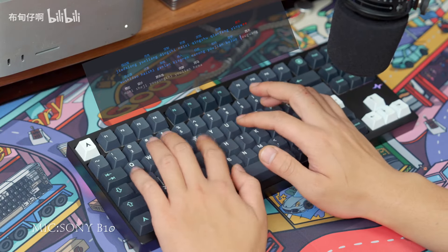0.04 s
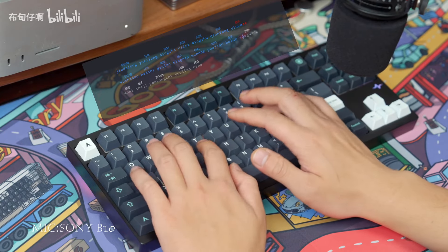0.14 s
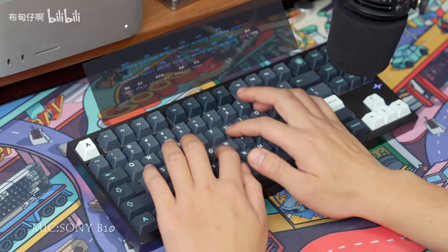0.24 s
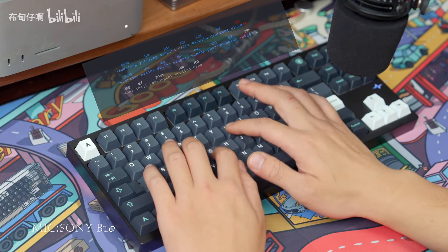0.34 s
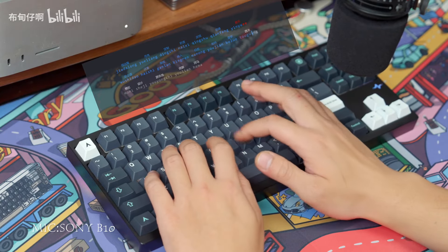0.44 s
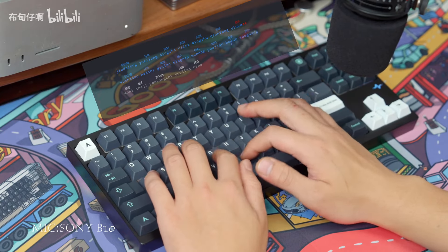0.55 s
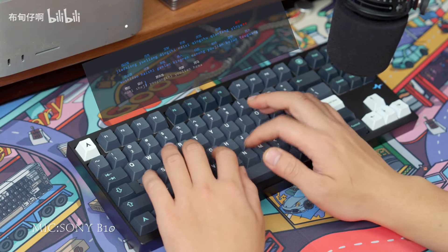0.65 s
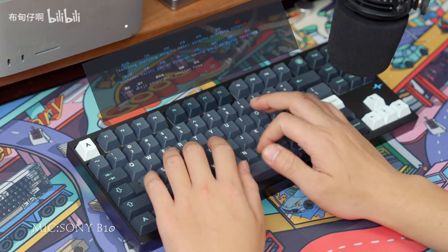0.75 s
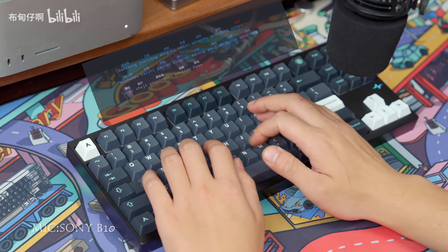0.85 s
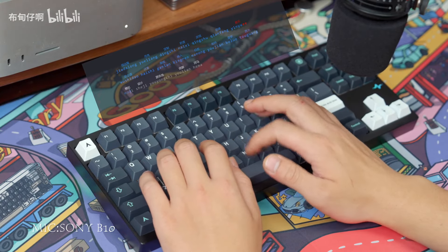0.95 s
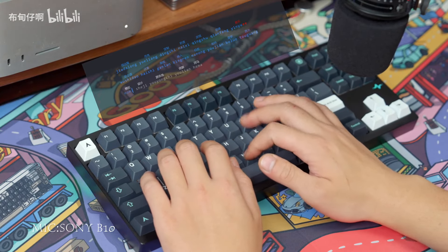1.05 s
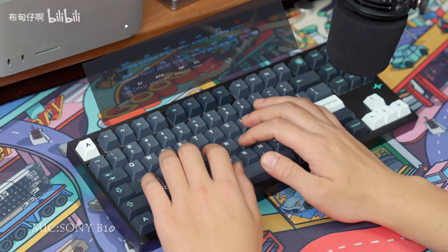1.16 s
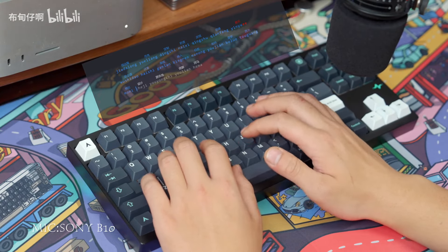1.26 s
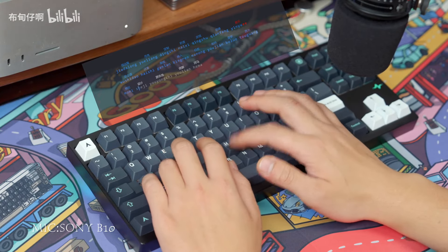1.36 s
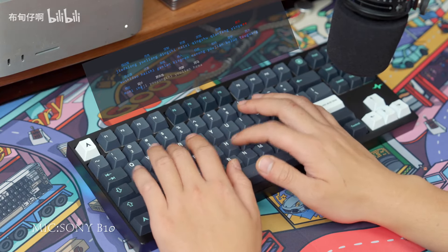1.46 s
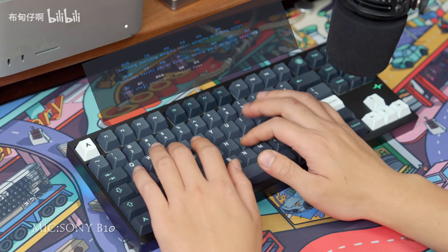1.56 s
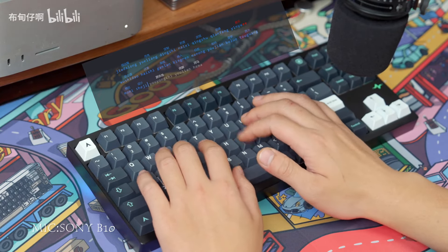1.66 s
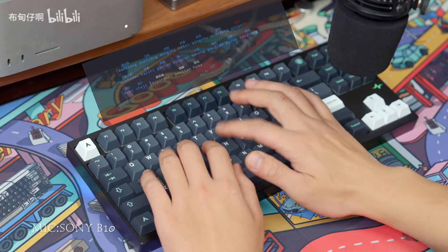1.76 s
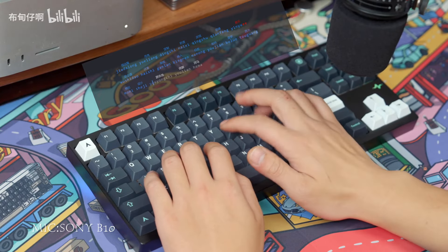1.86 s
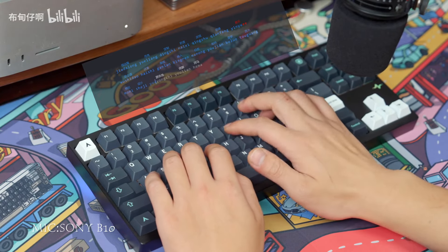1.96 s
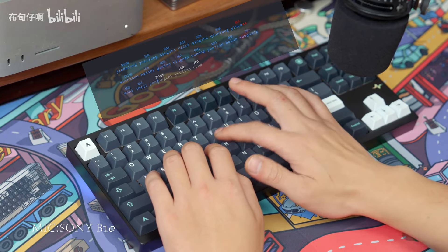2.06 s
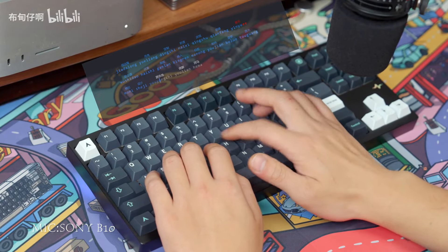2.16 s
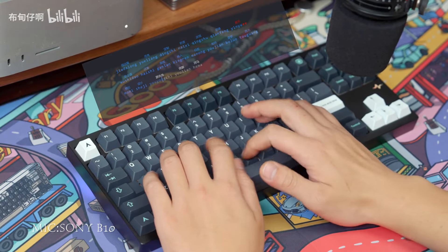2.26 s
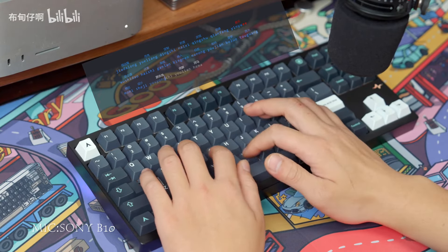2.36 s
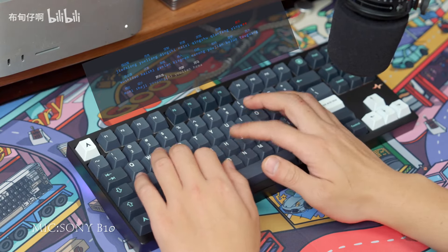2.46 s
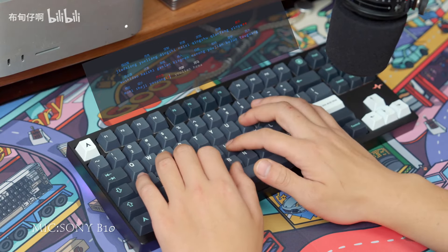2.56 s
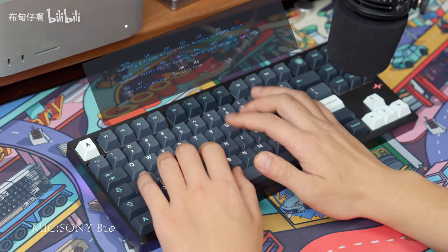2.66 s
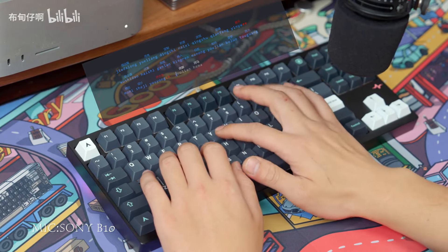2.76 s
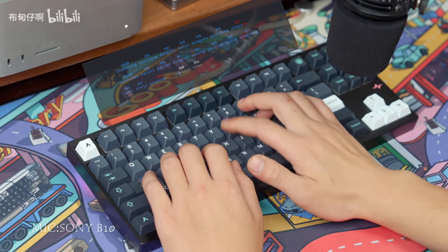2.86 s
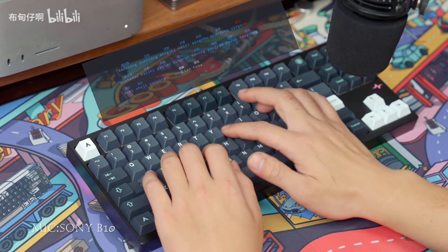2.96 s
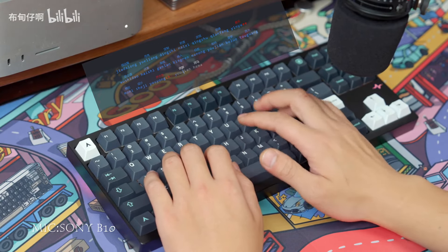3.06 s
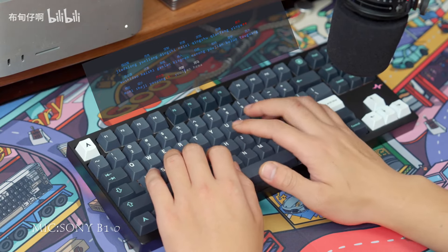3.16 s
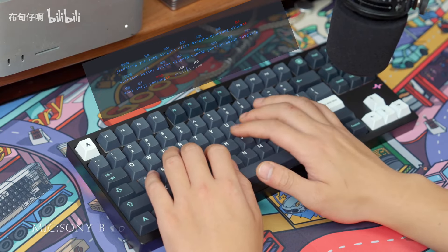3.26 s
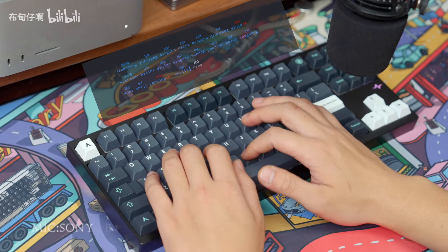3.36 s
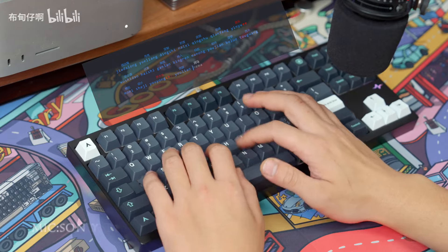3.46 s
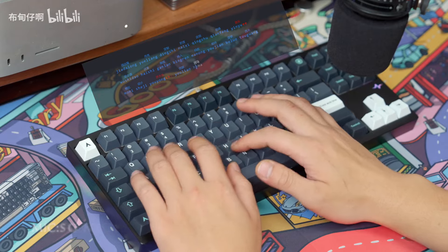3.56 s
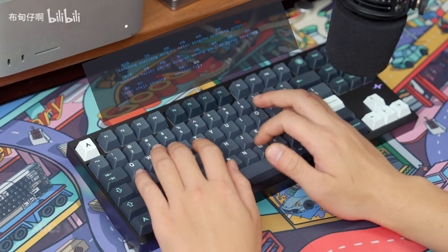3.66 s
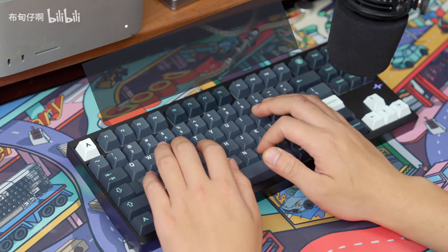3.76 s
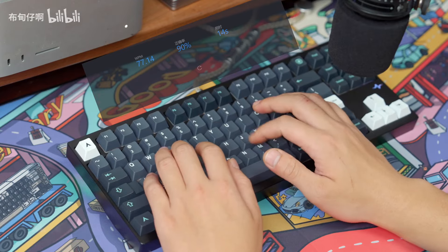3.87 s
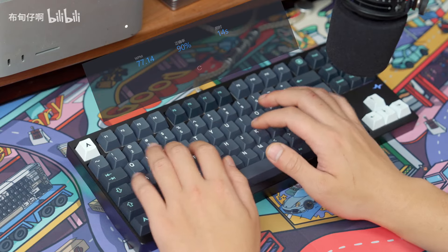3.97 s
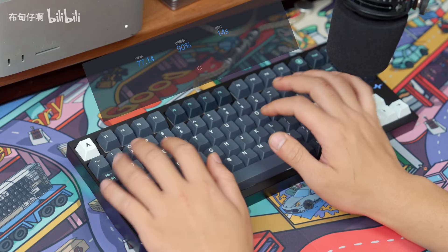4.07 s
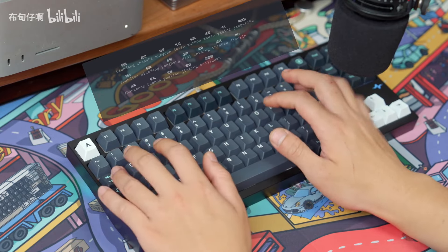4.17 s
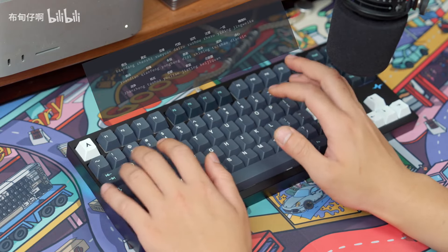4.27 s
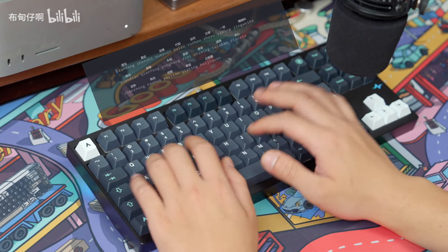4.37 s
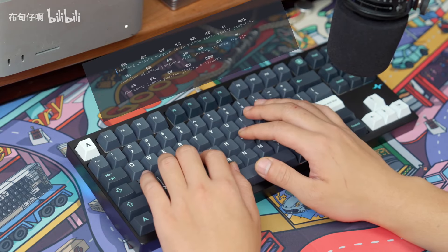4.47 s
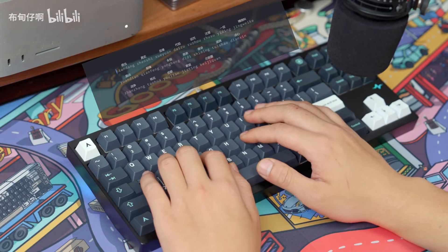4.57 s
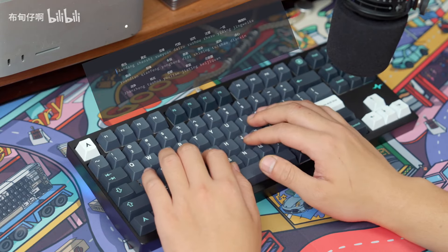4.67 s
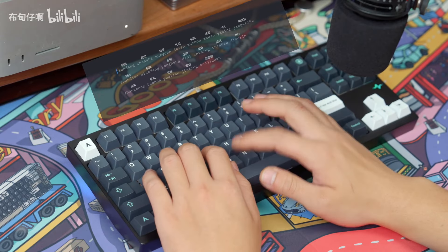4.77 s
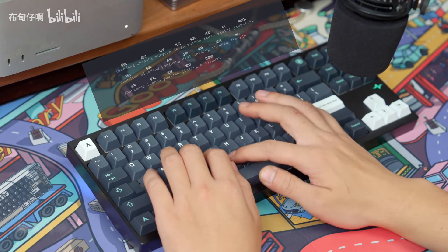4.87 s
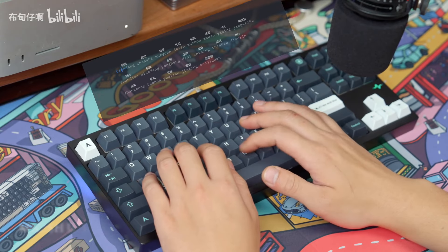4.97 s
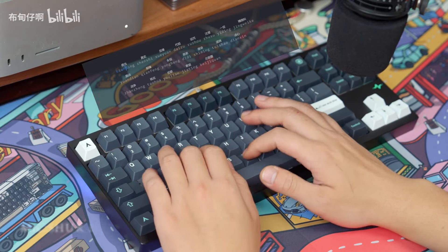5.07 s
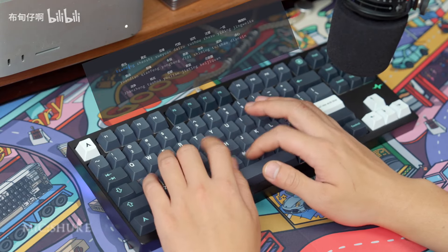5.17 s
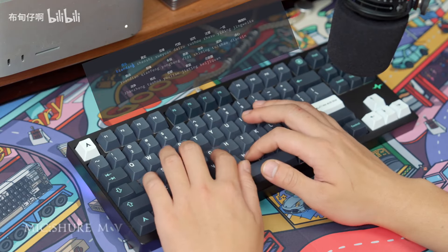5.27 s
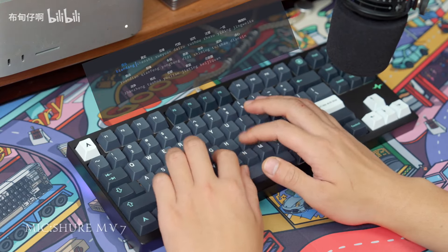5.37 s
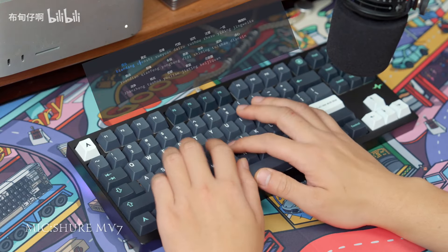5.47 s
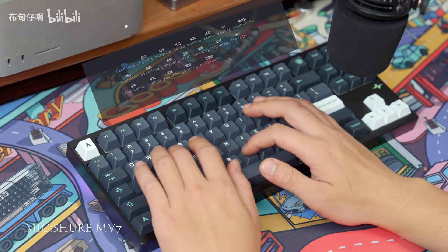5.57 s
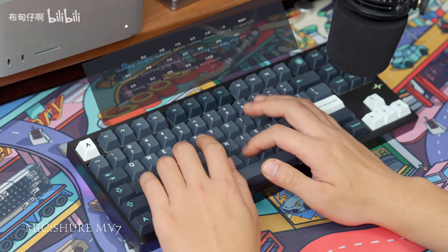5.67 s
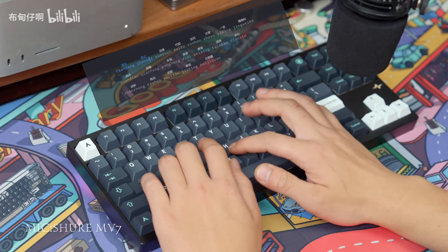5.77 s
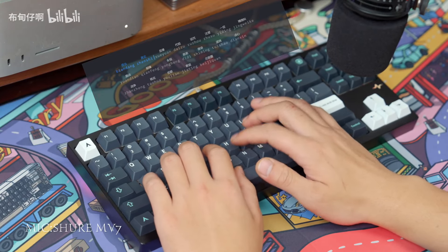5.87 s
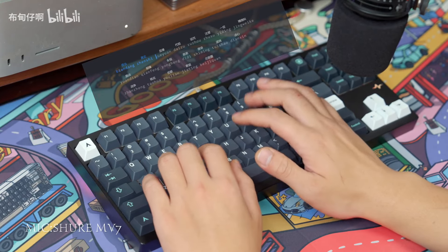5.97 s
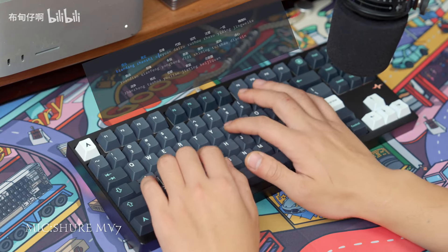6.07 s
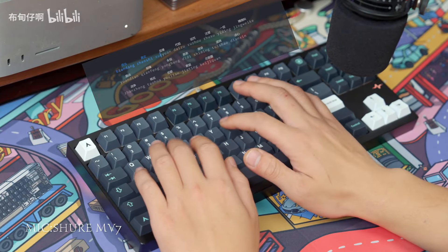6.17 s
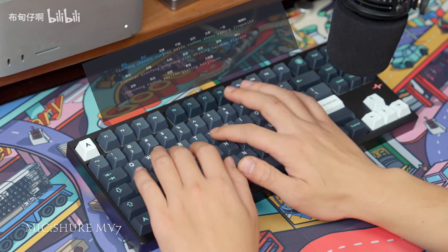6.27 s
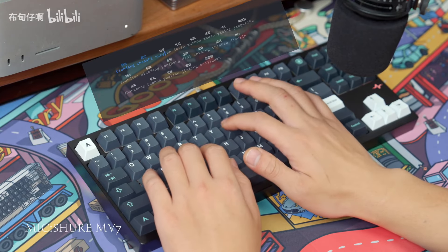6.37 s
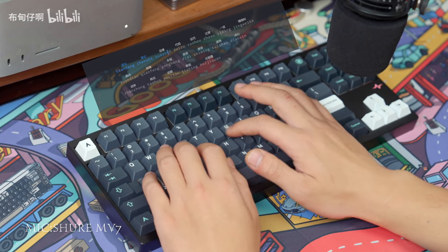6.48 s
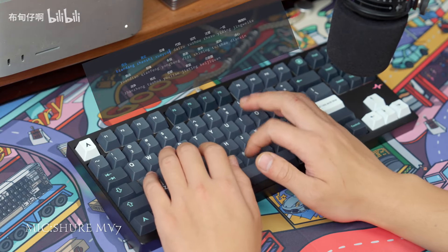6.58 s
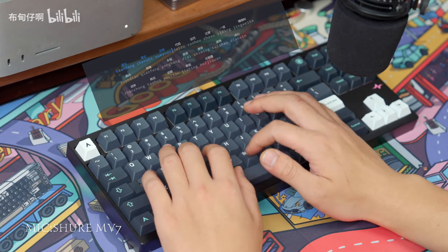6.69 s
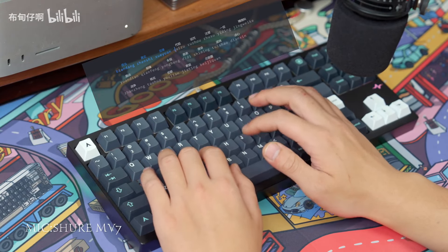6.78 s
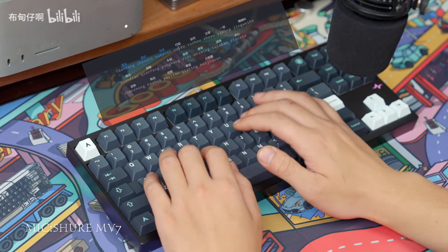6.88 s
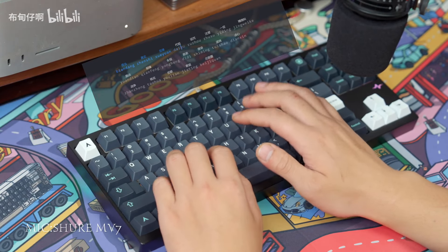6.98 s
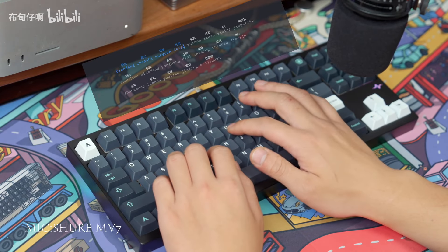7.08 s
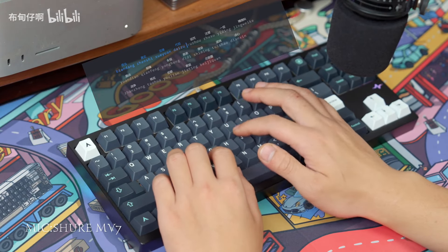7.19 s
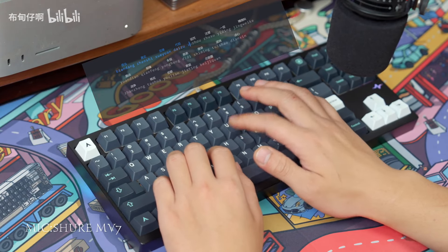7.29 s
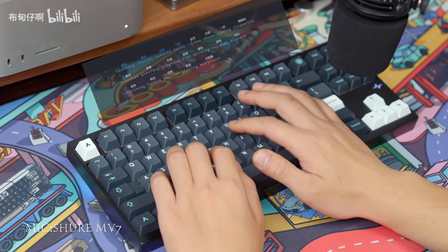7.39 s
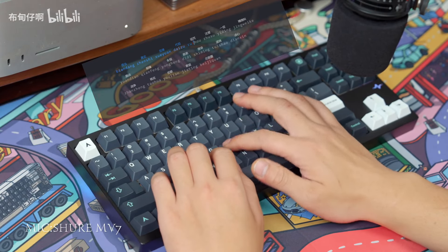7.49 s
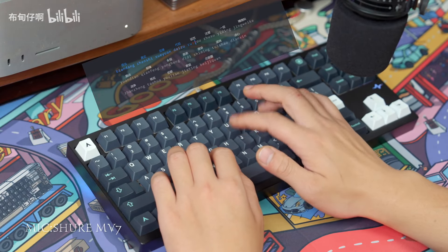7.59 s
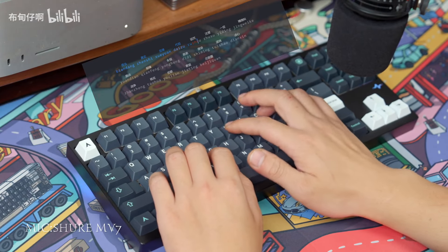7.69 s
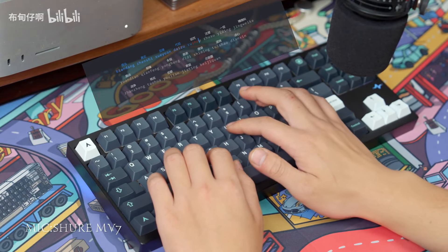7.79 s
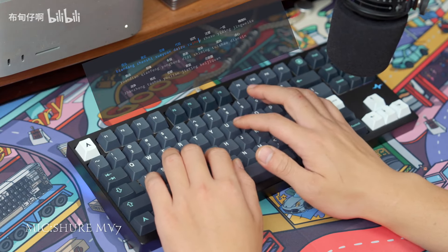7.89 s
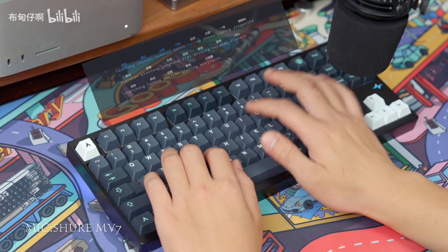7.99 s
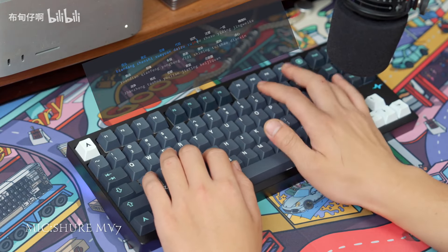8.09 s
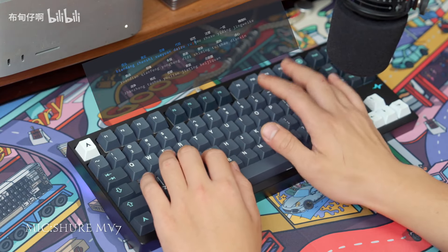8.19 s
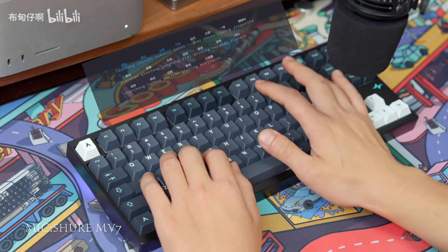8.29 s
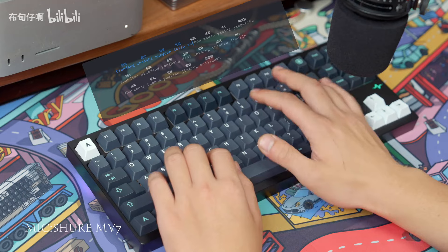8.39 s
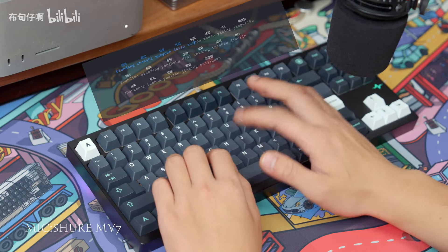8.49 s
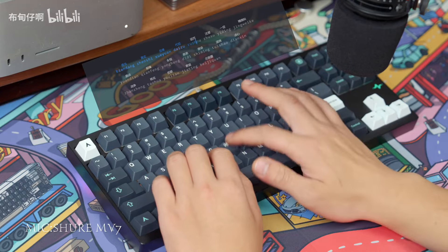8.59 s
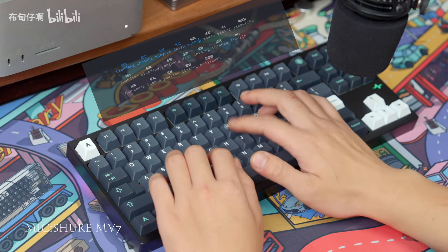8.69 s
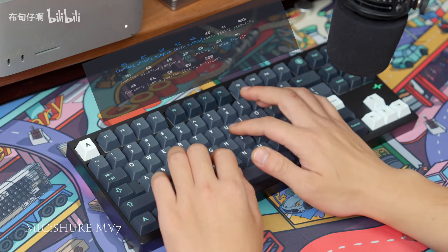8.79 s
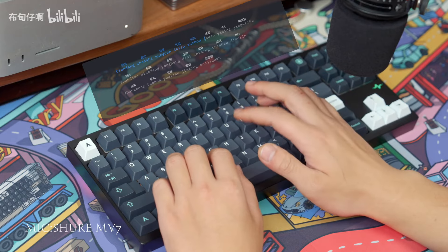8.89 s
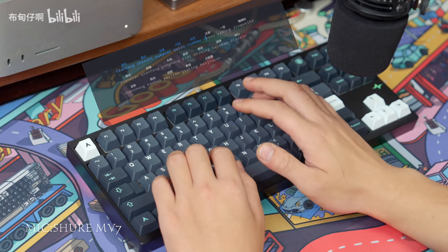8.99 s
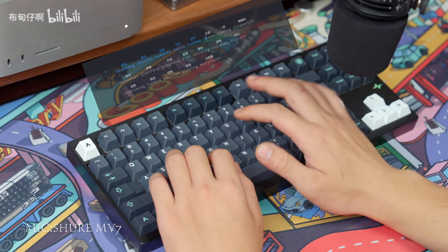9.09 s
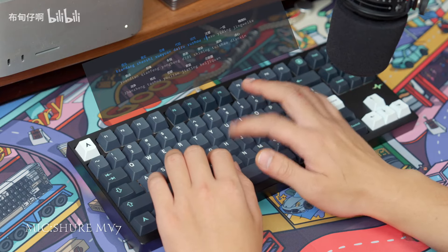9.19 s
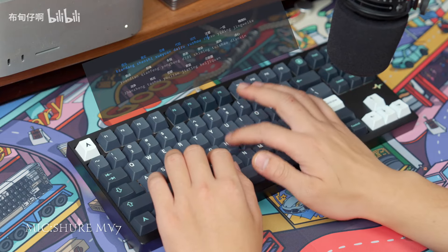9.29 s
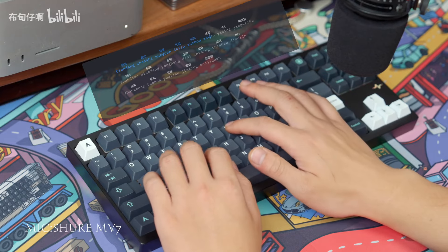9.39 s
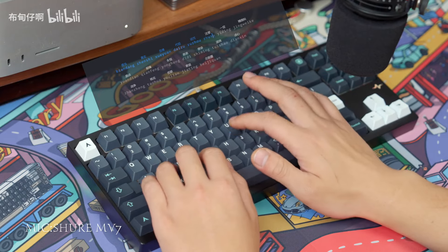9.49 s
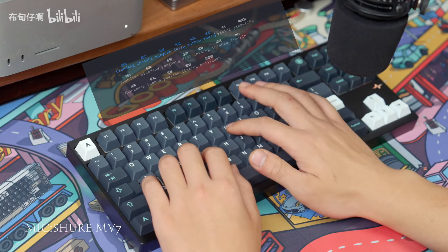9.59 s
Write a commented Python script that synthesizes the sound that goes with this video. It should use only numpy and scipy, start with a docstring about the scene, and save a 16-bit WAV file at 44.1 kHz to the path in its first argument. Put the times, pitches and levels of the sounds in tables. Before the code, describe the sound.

Irregular, rapid keyboard clacks, eight to fifteen a second, mix letter keys, softer upstrokes and hollower space-bar hits. The first half sounds slightly distant, bright and roomy over hiss, faint fan hum and low rumble. At about four and a half seconds the background drops and typing returns close, dry and fuller, with a short run of rattly long-key hits near eight seconds.

```python
"""Fast typing on a well-damped mechanical keyboard on a desk mat, in a small quiet room.
Each key clacks on the way down and up: short damped sines for its cap, switch and plate, about a millisecond.
Echoes, case ring, rattle and room follow each blow; filtered noise makes the hiss, fan and low rumble.
The first half is heard through an airy, hissy microphone, the second through a close, darker one."""
import sys
import numpy as np
from scipy import signal
from scipy.fft import rfft, irfft, next_fast_len
from scipy.io import wavfile

SR = 44100
rng = np.random.default_rng(int(sys.argv[2]) if len(sys.argv) > 2 else 0)


def pcm_store(signal):
    """Save signal as 16-bit PCM."""
    levels = np.round(np.clip(np.atleast_2d(signal), -1, 1) * 32767)
    wavfile.write(sys.argv[1], SR, levels.astype(np.int16).T)


N = 425124
SWITCH_S = 4.46  # middle of the cross-fade between the microphones


def amp(db):
    """Decibels to gain."""
    return 10 ** (np.asarray(db) / 20)


def unit(x):
    """Scale to rms 1."""
    return x / np.sqrt(np.mean(x ** 2) + 1e-20)


def along(points, hz):
    """Read a curve of (f, value) points on a log frequency axis."""
    f, value = np.transpose(points)
    return np.interp(np.log(hz + 1), np.log(f + 1), value)


def filtered(x, response):
    """Shape x by a gain that depends on frequency, padded so that the ends do not wrap."""
    size = next_fast_len(len(x) + SR // 2)
    spectrum = rfft(x, size) * response(np.fft.rfftfreq(size, 1 / SR))
    return irfft(spectrum, size)[:len(x)]


def add(track, s, sound):
    """Mix a sound into the track at s seconds, trimmed to fit."""
    start = round(s * SR)
    part = sound[max(-start, 0):max(len(track) - start, 0)]
    track[max(start, 0):][:len(part)] += part


def ring(t, hz, db, rise):
    """A heavily damped mode: it swells for rise seconds and dies as quickly."""
    envelope = t / rise * np.exp(1 - t / rise)
    return amp(db) * envelope * np.sin(2 * np.pi * hz * t)


SNAP_HZ = 7650  # mean pitch of the sharp snap of the contact
# relative scatter of pitch: no two switches ring quite alike
HOUSING_SPREAD, SNAP_SPREAD, STEM_SPREAD = 0.091, 0.11, 0.017
STEM_LAG_S = 0.000286  # the stem lands up to this long after the cap
HOUSING_SHARE = 0.61  # dB that the housing gains per dB of brightness; snap and stem follow it fully


def clack(ring_mix, long_key, cap_db, cap_hz, bright_db):
    """A hard plastic contact rings plate, cap and switch; a sharper one favours the high parts."""
    plate_db, housing_hz, housing_db, snap_db, stem_hz, stem_db = ring_mix
    spreads = np.array([HOUSING_SPREAD, SNAP_SPREAD, STEM_SPREAD])
    housing_tune, snap_tune, stem_tune = 1 + spreads * rng.standard_normal(size=3)
    housing_level = cap_db + housing_db + HOUSING_SHARE * bright_db
    treble_db = cap_db + bright_db
    t = np.arange(SR // 140) / SR
    stem_t = np.maximum(t - STEM_LAG_S * rng.random(), 0)
    plate = ring(t, 1446, cap_db + plate_db, rise=0.00061)
    cap = ring(t, cap_hz, cap_db, rise=0.0003)
    housing = ring(t, housing_hz * housing_tune, housing_level, rise=0.00026)
    snap = ring(t, SNAP_HZ * snap_tune, treble_db + snap_db, rise=0.00019)
    stem = ring(stem_t, stem_hz * stem_tune, treble_db + stem_db, rise=0.00016)
    # a long key adds the hollow under its cap and the tick of its stabiliser wire
    hollow = ring(t, 590, cap_db - 15.5, rise=0.00017) + ring(t, 930, cap_db - 13.5, rise=0.0005)
    wire = ring(t, 13500, treble_db - 11, rise=0.00026)
    return plate + cap + housing + snap + stem + long_key * (hollow + wire)


# Contacts as loud as each microphone hears them; levels and pitches are those of the cap.
# letter keys hitting bottom, and one faint finger touch at 8.13 s: (t/s, level/dB, cap f/Hz, brightness/dB)
LETTER_PRESSES = [(.192, -18.5, 2870, -1.5), (.2779, -18, 3350, -3.5), (.3248, -13, 2970, -2),
                  (.3973, -19.5, 2800, 3.5), (.4708, -14, 3000, -1), (.5498, -23, 2700, 11),
                  (.6432, -15.5, 2830, 2), (.6587, -17.5, 2750, 1), (.8755, -14, 2930, 1.5),
                  (.9224, -17, 3120, -3), (1.1073, -18.5, 2860, 2), (1.191, -16, 3070, -2.5),
                  (1.2522, -19, 2860, -14), (1.327, -19.5, 2640, -3), (1.4356, -16.5, 2520, 7),
                  (1.5125, -11.5, 2690, 6.5), (1.6043, -13.5, 2970, -2), (1.6864, -16.5, 2950, 1),
                  (1.7352, -16.5, 3100, -2.5), (1.8072, -23.5, 2820, -8), (1.915, -14.5, 2810, 5),
                  (2.0906, -15.5, 2940, -4), (2.2131, -18, 2930, -1), (2.3166, -12.5, 3150, -1.5),
                  (2.3957, -13.5, 2740, 2.5), (2.4535, -18.5, 2650, 3), (2.5191, -20, 2710, -7),
                  (2.596, -22.5, 2670, 4.5), (2.6431, -15.5, 2830, 5.5), (2.694, -15, 2830, 1),
                  (2.7414, -17.5, 2680, -5.5), (2.8846, -32, 3030, -2), (2.9565, -14.5, 3040, -2),
                  (3.0286, -20.5, 2930, -5), (3.195, -17.5, 2770, -0.5), (3.3381, -11.5, 2920, 0.5),
                  (3.4123, -25, 2760, 6.5), (3.4658, -15, 2720, 3.5), (3.5755, -21, 2570, -9),
                  (3.652, -16.5, 2780, 4), (3.7077, -18.5, 3040, -3.5), (3.8372, -12.5, 2940, 2.5),
                  (3.9204, -22.5, 2670, 10.5), (4.9434, -10, 2960, -3), (5.0468, -11, 2700, -1),
                  (5.0727, -20, 2400, 7), (5.1523, -10.5, 2830, -2.5), (5.191, -15.5, 2860, -2.5),
                  (5.2645, -19.5, 2520, 11.5), (5.3244, -12, 2990, -4), (5.3769, -14.5, 2730, 3),
                  (5.4559, -16, 2960, -14), (5.5296, -15.5, 3170, -4), (5.5854, -7.5, 2630, 2.5),
                  (5.6684, -11, 2790, 1.5), (5.7431, -14, 2920, -5), (5.7948, -11.5, 2750, 1.5),
                  (5.8833, -13.5, 2720, 1.5), (5.9636, -10, 2720, 1.5), (6.133, -14, 3000, -6),
                  (6.1753, -37, 2900, 5), (6.1822, -5.5, 2700, 0), (6.3343, -14.5, 2820, -2),
                  (6.4007, -9, 2650, -1.5), (6.5367, -9.5, 2690, -3.5), (6.6156, -21, 2590, 4.5),
                  (6.7426, -12.5, 2850, -1), (6.8841, -13, 2830, -1.5), (6.9788, -21.5, 2770, 5.5),
                  (7.0192, -16, 2750, -21), (7.0267, -10.5, 2680, -1), (7.134, -14.5, 3170, -3),
                  (7.2003, -7, 2670, -1), (7.3745, -14.5, 3160, -6), (7.4492, -10, 2730, -4),
                  (7.6014, -12, 2830, -5), (7.7467, -12, 2670, 0), (7.821, -7, 2660, -2.5),
                  (8.1258, -46.5, 3000, 5), (8.5895, -12, 3180, -8), (8.6669, -4, 2790, 3.5),
                  (8.789, -12, 2650, -2), (8.8359, -7.5, 2660, -2), (8.987, -9.5, 3200, -5),
                  (9.3566, -6.5, 2750, 3.5), (9.4858, -8, 2740, -2.5)]
# letter keys springing back up: (t/s, level/dB, cap f/Hz)
LETTER_RELEASES = [(.3099, -28, 2340), (.3646, -24.5, 2350), (0.4136, -30, 2560), (0.492, -25.5, 2590),
                   (.7756, -23, 2480), (.9712, -23.5, 2560), (1.5372, -22.5, 2420), (1.594, -21.5, 2580),
                   (1.8274, -29, 2250), (1.9865, -24, 2380), (2.1406, -26.5, 2340), (2.3041, -30, 2440),
                   (2.502, -24, 2550), (2.781, -28.5, 2190), (2.94, -29, 2280), (3.072, -29.5, 2260),
                   (3.1313, -24.5, 2800), (3.2839, -24.5, 2500), (3.742, -26.5, 2550),
                   (3.7907, -30.5, 2830), (3.9686, -26.5, 2620), (4.59, -42, 2650), (5.0546, -22, 2560),
                   (5.1798, -26, 2440), (5.2472, -16.5, 2860), (5.3219, -22, 2800), (5.417, -30.5, 2440),
                   (5.4841, -26, 2370), (5.6126, -25.5, 2870), (5.75, -27, 2620), (5.8133, -17.5, 2620),
                   (5.9345, -36, 2580), (5.9962, -17.5, 2550), (6.0464, -20.5, 2290), (6.2263, -19.5, 2730),
                   (6.269, -20, 2360), (6.4294, -33, 2630), (6.4707, -18.5, 2390), (6.6401, -24, 2360),
                   (6.834, -22.5, 2550), (7.0854, -18, 2350), (7.257, -30.5, 2880), (7.2938, -25.5, 2200),
                   (7.5192, -17.5, 2430), (7.6731, -17, 2560), (7.866, -19.5, 2390), (7.9626, -30.5, 2360),
                   (8.7358, -14, 2530), (8.8882, -17.5, 2400), (8.9644, -23.5, 2340), (9.4242, -17, 2530)]
# the space bar, down and up, with one faint bounce at .75 s: (t/s, level/dB, cap f/Hz, brightness/dB)
SPACE_BAR_HITS = [(.0052, -17, 2750, 0.5), (.7432, -13, 3240, 2), (.7535, -39, 3380, 22),
                  (2.012, -16.5, 3170, 1), (3.5576, -17, 3450, 0), (5.4582, -13.5, 2920, 6),
                  (5.547, -29, 2500, -15), (5.971, -14.5, 2940, 1), (6.0773, -35, 2540, -16),
                  (6.8166, -19, 2900, 2.5), (6.9304, -31, 2600, -16), (7.2827, -14, 2940, 1),
                  (8.9156, -16.5, 2900, -1), (9.0285, -29.5, 2580, -10), (9.575, -15.5, 2850, -2)]
# the enter key, deeper, down and up: (t/s, level/dB, cap f/Hz, brightness/dB)
ENTER_HITS = [(4.3059, -16.5, 1920, 1.5), (4.3808, -31, 1710, 0)]
# long keys on a stabiliser wire, down and up: (t/s, level/dB, cap f/Hz, brightness/dB)
LONG_KEY_HITS = [(4.2358, -14.5, 2810, -1), (8.1988, -8.5, 2340, -0.5), (8.2587, -14.5, 2380, -5.5),
                 (8.3176, -11.5, 2330, -1.5), (8.391, -19, 2240, -8), (8.45, -13.5, 2360, -3),
                 (8.544, -18, 2240, -4.5)]
# What each kind of contact rings; levels are against its cap, pitches before their scatter:
# (plate level/dB, housing f/Hz, housing level/dB, snap level/dB, stem f/Hz, stem level/dB)
PRESS_MIX = (-32.5, 4678, -5, -19.5, 10722.5, -8)
RELEASE_MIX = (-24.5, 4593, -33.5, -28.5, 10853, -21.5)
SPACE_MIX = (-12.5, 5099.5, -5.5, -12, 11000, -13)
ENTER_MIX = (-6.5, 4972, -2.5, -6, 11156.5, -9)
LONG_MIX = (-23.5, 4800, -8, -6, 10800, -18)


def keystrokes(start, end, bright_db):
    """(t/s, clack) of every contact from start to end; bright_db tilts the high parts for the microphone."""
    releases = [(*row, 0) for row in LETTER_RELEASES]  # no extra brightness
    kinds = [(LETTER_PRESSES, PRESS_MIX, False), (releases, RELEASE_MIX, False),
             (SPACE_BAR_HITS, SPACE_MIX, False), (ENTER_HITS, ENTER_MIX, False),
             (LONG_KEY_HITS, LONG_MIX, True)]
    hits = []
    for rows, ring_mix, long_key in kinds:
        for s, db, hz, bright in rows:
            if start <= s < end:
                hits.append((s, clack(ring_mix, long_key, db, hz, bright + bright_db)))
    return hits


# faint modes of the case and switch springs, shaken by every blow: (f/Hz, mean level/dB, t60/s)
CASE_MODES = [(780, -51, .13), (1130, -53.5, .13), (1420, -56, .13), (8200, -43, .02), (13950, -32, .035)]


def case_ring():
    """The faint after-ring of case and springs: decaying sines at new strengths for every blow."""
    t = np.arange(SR // 8) / SR
    total = np.zeros(len(t))
    for hz, db, t60 in CASE_MODES:
        total += amp(db + rng.normal(0, 2) - 60 * t / t60) * np.sin(2 * np.pi * hz * t)
    return total


def scatter(envelope):
    """Dense random paths under an envelope, of energy 1."""
    return envelope * rng.standard_normal(len(envelope)) / np.linalg.norm(envelope)


# how long the room holds each pitch: (f/Hz, t60/s)
ROOM_DECAY = [(300, 1.6), (2800, 0.88), (6000, 0.79), (12000, 0.61)]


def room_tail():
    """A fresh room answer of energy 1: noise whose treble dies first."""
    hz, t, bins = signal.stft(rng.standard_normal(SR * 3 // 5), SR, nperseg=256)
    decay = amp(-60 * t / along(ROOM_DECAY, hz)[:, None])
    tail = signal.istft(bins * decay, SR, nperseg=256)[1]
    return tail / np.linalg.norm(tail)


def typing(keys, echoes, rattle_db, rattle_t60, room_db, slide_db):
    """Each blow through its path to one microphone; echoes are near surfaces as (delay/s, level/dB)."""
    track = np.zeros(N)
    t = np.arange(SR // 25) / SR
    walls = room_tail()
    for s, hit in keys:
        # every key shares half of the room's answer with the others
        path = amp(room_db) * (walls + room_tail()) / np.sqrt(2)
        path[0] += 1  # the direct sound
        # the blow spreads through the case and shakes the caps around it
        add(path, 0, case_ring())
        add(path, .001, amp(rattle_db) * scatter(amp(-60 * t / rattle_t60)))
        for delay, db in echoes:
            # every key lies at a slightly different distance
            path[round(abs(delay * rng.normal(1, .04)) * SR)] += amp(db)
        add(track, s, signal.fftconvolve(hit, path))
        # before it lands the stem rubs along its housing, growing, faint and brighter than the blow
        rub = np.diff(scatter(np.linspace(0, 1, SR // 45)))
        slide = amp(slide_db + rng.normal(0, 5.2)) * rub
        add(track, s - len(slide) / SR, signal.fftconvolve(hit, slide))
    return track


# tone of the airy microphone: (f/Hz, level/dB)
AIRY_RESPONSE = [(200, -16), (900, -8), (1400, -4.5), (1900, 4), (2300, -3.5), (2800, 0.5), (6000, -4),
                 (11500, -3), (12600, -3.5), (14000, -5.5)]


def airy_microphone():
    """Further off: faint early echoes, much room and hiss."""
    keys = typing(keystrokes(0, SWITCH_S, bright_db=5.0),
                  echoes=[(.00068, -18.5), (.0042, -32.5), (.0082, -17), (.033, -20.5)],
                  rattle_db=-5, rattle_t60=0.016, room_db=-11, slide_db=-29.5)
    toned = filtered(keys, lambda hz: amp(along(AIRY_RESPONSE, hz)))
    return toned + amp(-50.0) * noise(AIRY_NOISE) + fan(AIRY_FAN) + rumble()


# tone of the close microphone: (f/Hz, level/dB)
CLOSE_RESPONSE = [(200, -19), (650, -12), (1000, -3.5), (1800, 3), (5000, 2), (8000, -3.5), (11000, -3),
                  (12500, -8.5), (14000, -21)]


def close_microphone():
    """Right above the keys: dry clacks over a low, dull floor."""
    before = keystrokes(SWITCH_S - .5, SWITCH_S, bright_db=-3.0)
    hanging = [(s, amp(7) * hit) for s, hit in before]
    keys = typing(hanging + keystrokes(SWITCH_S, N / SR, bright_db=-4.5),
                  echoes=[(.0024, -51), (.0068, -23)],
                  rattle_db=-14.0, rattle_t60=0.011, room_db=-21.5, slide_db=-23.5)
    toned = filtered(keys, lambda hz: amp(along(CLOSE_RESPONSE, hz)))
    return toned + amp(-57.0) * noise(CLOSE_NOISE) + fan(CLOSE_FAN)


# a computer fan's lines as each microphone hears them: (f/Hz, level/dB)
AIRY_FAN = [(236, -60.5), (255, -58.5), (469, -65), (615, -67)]
CLOSE_FAN = [(145.5, -65.5), (236, -67), (254, -68), (490, -67.5), (791, -74)]
HUM_WIDTH_HZ = 4.2  # how far the fan's lines waver


def fan(lines):
    """Computer fan hum: noise squeezed into narrow, slightly unsteady lines."""
    def shape(f):
        return sum(amp(db) / (1 + ((f - hz) / HUM_WIDTH_HZ) ** 2) for hz, db in lines)
    level = np.linalg.norm([amp(db) for hz, db in lines])
    return level * unit(filtered(rng.standard_normal(N), shape))


def narrow(centre_hz, width):
    """A fuzzy line of rms 1: noise within about width Hz of the centre."""
    return unit(filtered(rng.standard_normal(N), lambda hz: 1 / (1 + ((hz - centre_hz) / width) ** 2)))


# low thumps: (t/s, peak level/dB, fade on either side/dB per s)
LOW_THUMPS = [(2.02, -44.5, 359), (2.48, -40.5, 120)]
# a low drone that swells for a while: (start t/s, end t/s, level while on/dB, level otherwise/dB, fade/s)
DRONE_SWELL = (2.88, 4.1, -53, -68, .15)
DRONE_HZ, DRONE_WAVER = 64, .35  # pitch; unsteady part against the steady one


def rumble():
    """Low thumps of swelling noise and a wavering sine drone, for the airy microphone only."""
    t = np.arange(N) / SR
    thumps = sum(amp(db - fade * abs(t - s)) for s, db, fade in LOW_THUMPS)
    start, end, on_db, off_db, fade_s = DRONE_SWELL
    outside_s = np.maximum(start - t, t - end)
    swell = amp(np.interp(outside_s, [0, fade_s], [on_db, off_db]))
    drone = np.sin(2 * np.pi * DRONE_HZ * t) + DRONE_WAVER * narrow(DRONE_HZ, width=5)
    return thumps * narrow(45, width=46) + swell * drone


# colour of the room noise in each microphone: (f/Hz, relative level per Hz/dB)
AIRY_NOISE = [(15, -26), (25, -10.5), (95, 0.5), (172, -2.5), (264, -4.5), (344, -5), (1060, -12.5),
              (1670, -21), (4040, -36.5), (5570, -41.5), (6200, -34), (7890, -38.5), (12100, -37.5),
              (13800, -33), (15000, -74.5)]
CLOSE_NOISE = [(15, -75), (25, -21), (106, -16.5), (142, -14), (202, -17), (224, -9.5), (250, -8),
               (286, -15.5), (318, -17), (420, -21), (488, -17.5), (729, -30), (3090, -34), (3830, -40),
               (15000, -70)]


def noise(spectrum):
    """Steady room noise: white noise coloured by a spectrum, of rms 1."""
    return unit(filtered(rng.standard_normal(N), lambda hz: amp(along(spectrum, hz))))


def scene():
    """A quick cross-fade (40 ms) from the airy microphone to the close one."""
    close = np.clip((np.arange(N) / SR - SWITCH_S) / 0.04 + .5, 0, 1)
    mix = (1 - close) * airy_microphone() + close * close_microphone()
    return mix[None]


CEILING, TOP_HZ = .86, 14500  # level at which a soft limit rounds off the loudest peaks; band limit


def record(dry):
    """The loudest peaks are rounded off, then a steep low-pass cuts the top."""
    rounded = dry / (1 + (dry / CEILING) ** 6) ** (1 / 6)
    return np.array([filtered(x, lambda hz: 1 / np.sqrt(1 + (hz / TOP_HZ) ** 80)) for x in rounded])


dry = scene()
out = record(dry)
pcm_store(out)
```